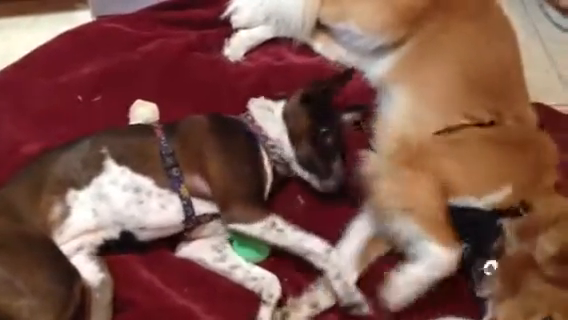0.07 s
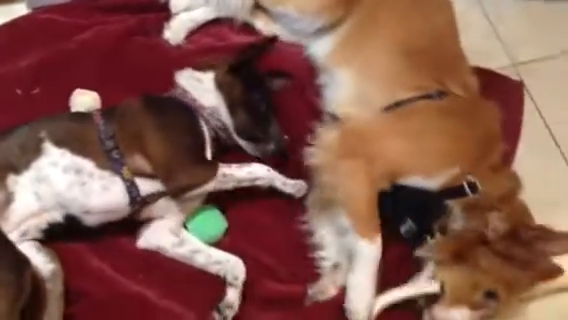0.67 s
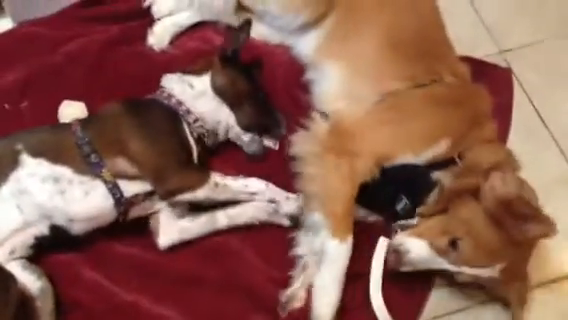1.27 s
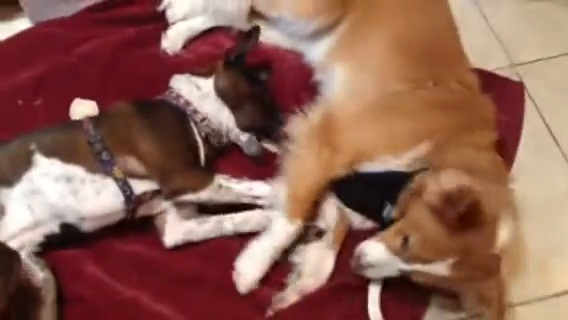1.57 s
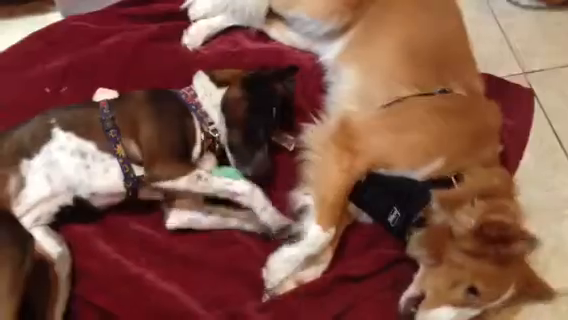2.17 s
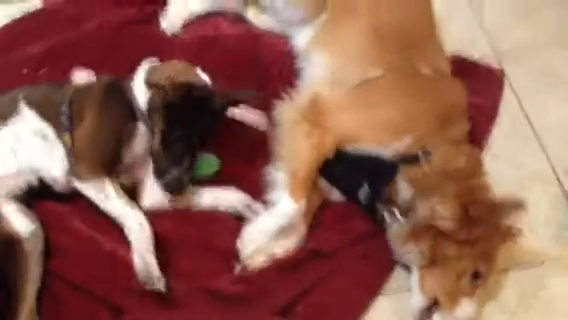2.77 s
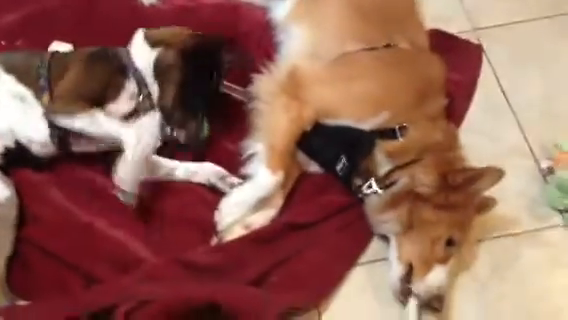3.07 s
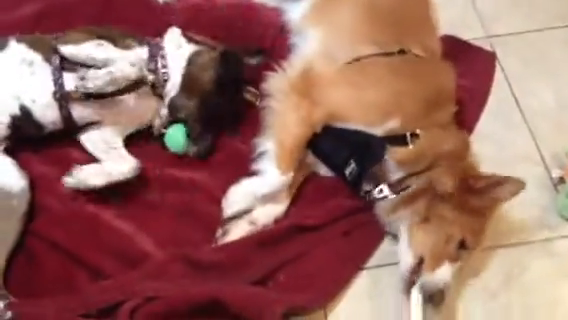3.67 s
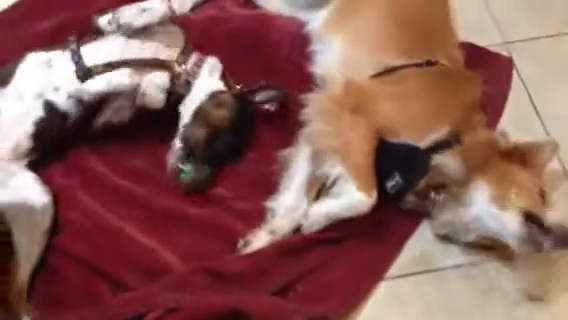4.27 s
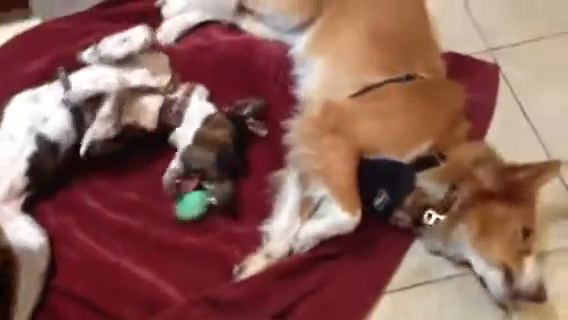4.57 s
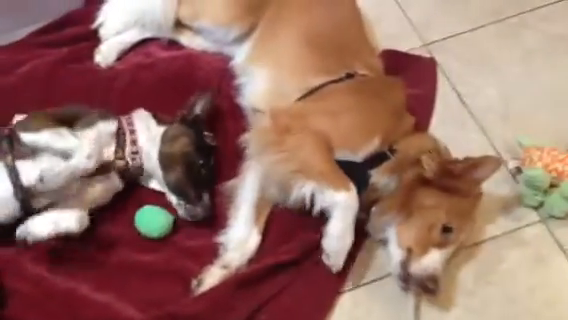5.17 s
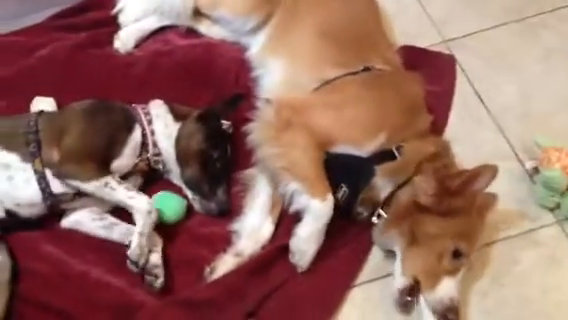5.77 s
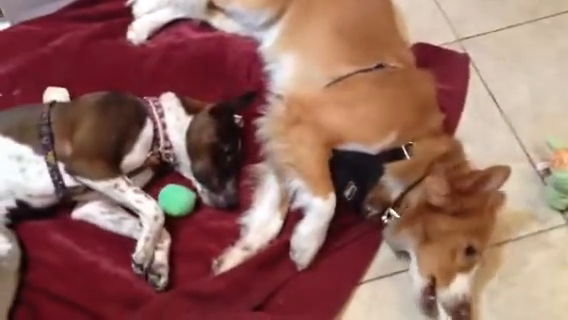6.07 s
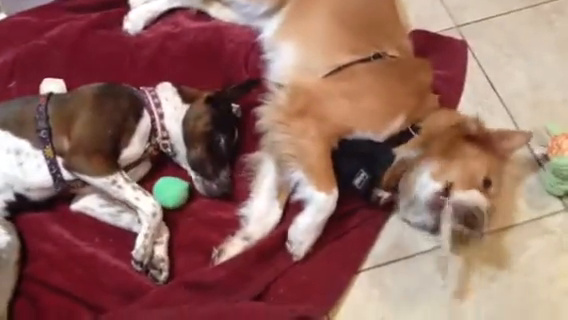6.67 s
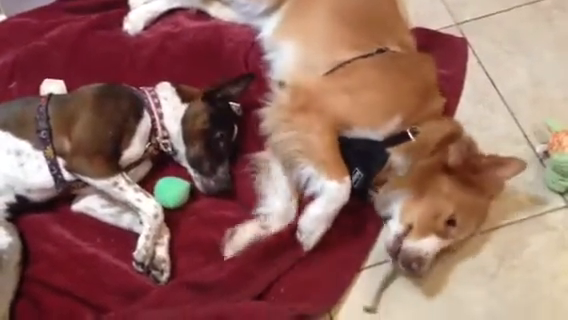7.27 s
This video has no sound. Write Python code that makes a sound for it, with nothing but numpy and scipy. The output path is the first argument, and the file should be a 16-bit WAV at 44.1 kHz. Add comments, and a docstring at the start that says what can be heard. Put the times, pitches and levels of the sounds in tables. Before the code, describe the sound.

A ventilation fan hums low and steady in a tiled room, with a faint hiss of fur sliding on a blanket as two dogs play. Metal collar tags tinkle brightly right at the start. Teeth click softly at 1.3 seconds and the tags clink at 1.7. From 2 to 2.6 seconds a chew bone clatters on teeth and tiles in quick, dry, slightly ringing knocks, with a few more around 3.3. A very faint, thin whine comes at 3.6 and a tag clink at 4. A run of hollow tooth snaps follows, ending in the loudest bone crack at about 4.3 seconds. Lighter knocks, snaps and clinks scatter between 5 and 6.3 seconds, with another faint whine near 6.2. Three sharp bone knocks land between 6.8 and 7 seconds, leaving the hum. The hits have a short room echo.

```python
"""A long chew bone knocks on teeth and floor tiles as two dogs wrestle on a blanket in a tiled room.
Each knock is a dry crack plus the bone's bending modes, damped by the jaws that hold it.
Snapping teeth ring the hollow of the mouth, metal collar tags tinkle and a dog whines faintly.
Underneath, fur rubs on the blanket and a ventilation fan hums."""
import sys
import numpy as np
from scipy import signal
from scipy.fft import rfft, irfft
from scipy.io import wavfile
from scipy.ndimage import uniform_filter1d

SR = 44100
rng = np.random.default_rng(int(sys.argv[2]) if len(sys.argv) > 2 else 0)


def generate_wav(sig):
    """Save sig (samples, or channels by samples) to the path in sys.argv[1] as 16-bit PCM at SR."""
    pcm = np.round(np.clip(np.atleast_2d(sig).T, -1, 1) * 32767).astype(np.int16)
    wavfile.write(sys.argv[1], SR, pcm)


N = 322812
TIME = np.arange(N) / SR
RING_TIME = np.arange(4096) / SR  # time axis of one hit
ATTACK = int(.007 * SR)  # a hit's level is set over these first samples


def undb(db):
    """Decibels to gain."""
    return 10 ** (np.asarray(db) / 20)


def unit(x, count=None):
    """Scale to rms 1, judged on the first count samples."""
    return x / np.sqrt(np.mean(x[:count] ** 2) + 1e-30)


def log_gain(colour, size):
    """Natural-log gain of an EQ curve of (freq_hz, level_db) points on the bins of a transform."""
    hz, db = np.transpose(colour)
    bin_hz = np.arange(size // 2 + 1) * SR / size
    return np.log(undb(np.interp(np.log(bin_hz + 1), np.log(hz), db)))


def noise(colour):
    """Noise of rms 1, shaped by an EQ curve."""
    return unit(irfft(rfft(rng.standard_normal(N)) * np.exp(log_gain(colour, N)), N))


def click(colour, size=1024):
    """The tightest click with a given EQ curve: a minimum-phase impulse."""
    cepstrum = irfft(log_gain(colour, size))
    cepstrum[1:size // 2] *= 2
    cepstrum[size // 2 + 1:] = 0
    return irfft(np.exp(rfft(cepstrum)))


def drift(rate_hz):
    """Smooth random modulation of rms 1."""
    hold = int(SR / rate_hz)
    steps = np.repeat(rng.standard_normal(N // hold + 1), hold)
    return unit(uniform_filter1d(uniform_filter1d(steps, hold), hold)[:N])


def fade(t, t60):
    """Exponential decay by 60 dB in t60 seconds."""
    return np.exp(-np.log(1000) * t / t60)


def contact(t60, grit, size=512):
    """A hard touch followed by a brief chatter of the surfaces."""
    push = grit * unit(rng.standard_normal(size)) * fade(RING_TIME[:size], t60)
    push[0] += 1
    return push


def ring(push, hz, t60, rise_cycles=1.66):
    """Modes driven by one push, a row each, with a quick build-up and rms 1 over the attack."""
    hz, t60 = np.reshape(hz, (-1, 1)), np.reshape(t60, (-1, 1))
    build_up = 1 - np.exp(-hz * RING_TIME / rise_cycles)
    free = np.sin(2 * np.pi * hz * RING_TIME) * fade(RING_TIME, t60) * build_up
    modes = signal.fftconvolve(free, push[None], axes=1)[:, :len(RING_TIME)]
    return modes / np.sqrt(np.mean(modes[:, :ATTACK] ** 2, axis=1, keepdims=True))


def radiate(x, hz):
    """Low cut: a small body hardly moves air below hz."""
    return signal.sosfilt(signal.butter(2, hz, "highpass", fs=SR, output="sos"), x)


def add(out, start_s, x):
    """Mix x into out at start_s."""
    i = max(int(start_s * SR), 0)
    out[i:i + len(x)] += x[:max(N - i, 0)]


def room_tails(count=12, size=16384, predelay_s=0.0052, build_s=0.0023, wall_s=.0115, wall_db=-12):
    """Reverbs for several spots in the tiled room: a slap off a near wall and a diffuse tail."""
    # reverb bands: centre_hz, t60_s, relative_db
    bands = [(400, 0.28, 9), (1020, 0.39, 4.5), (2300, 0.32, 0.5), (4550, 0.32, 3), (7200, 0.34, 0),
             (13800, 0.22, 2.5)]
    hz, t60, db = np.transpose(bands)
    t = np.arange(size) / SR
    log_hz = np.log(np.arange(size // 2 + 1) * SR / size + 1)
    spectra = rfft(rng.standard_normal((count, size)))
    tails = np.zeros((count, size))
    for band, decay_s, band_db in zip(np.eye(len(hz)), t60, db):
        crossover = np.interp(log_hz, np.log(hz), band)
        tails += undb(band_db) * irfft(spectra * crossover, size) * fade(t, decay_s)
    onset = np.clip((t - predelay_s) / build_s, 0, 1)
    tails *= onset / np.linalg.norm(onset * fade(t, t60.mean()))
    tails[:, int(wall_s * SR)] += undb(wall_db)
    return tails


def in_room(x, tails, wet_db):
    """The dry sound plus a reverb picked at random, since the dogs keep moving."""
    out = undb(wet_db) * signal.fftconvolve(x, tails[rng.integers(len(tails))])
    out[:len(x)] += x
    return out


def machine_tone(hz, waver_hz=0.783, waver_db=2, knot_count=40):
    """A tone of rms near 1 that wavers slightly in pitch and level."""
    knots = np.linspace(0, TIME[-1], knot_count)
    pitch_hz = np.interp(TIME, knots, hz + waver_hz * rng.standard_normal(knot_count))
    gain = np.interp(TIME, knots, undb(waver_db * rng.standard_normal(knot_count)))
    return np.sqrt(2) * gain * np.sin(2 * np.pi * np.cumsum(pitch_hz) / SR)


def fan(air_db=-50.5, flutter_db=0.111, motor_trim_db=-1):
    """The bed: rushing air, the hum of blades and mains, and a motor tone that swells."""
    # EQ of the rushing air: freq_hz, relative_db
    air_colour = [(25, -42), (55, -28.5), (100, -22), (150, -9), (235, -1), (300, -7), (480, -11.5),
                  (820, -11.5), (1400, -19.5), (2300, -24), (3600, -23.5), (4300, -36), (9000, -44.5),
                  (15500, -45)]
    # steady tones of fan and mains: pitch_hz, level_db
    hum_tones = [(86.5, -72), (120, -68), (149.5, -65.5), (200, -61.5), (230.5, -57), (249, -62.5),
                 (399.5, -68)]
    # fader moves of the motor tone: time_s, relative_db
    motor_swell = [(0, -65), (3.3, -67), (4.3, -52), (4.6, -64), (4.95, -52), (5.2, -62), (5.45, -51),
                   (7.32, -49.5)]
    air = noise(air_colour) * undb(air_db + flutter_db * drift(3.1))
    swell_db = np.interp(TIME, *np.transpose(motor_swell))
    motor = machine_tone(hz=172.4, waver_hz=0.33, waver_db=1.2) * undb(swell_db + motor_trim_db)
    hum = sum(undb(db) * machine_tone(hz) for hz, db in hum_tones)
    return air + motor + hum


def fur(rise_s=0.072, floor_db=-67.5, trim_db=-1, flicker_db=1):
    """Coats slide over the blanket in uneven strokes that start quickly and die away over a faint steady hiss."""
    # strokes of fur: start_s, relative_db, t60_s
    strokes = [(-.1, -53, 1.8), (.76, -59.5, 3.5), (1.66, -58.5, 3.9), (3.1, -67, 3), (4.55, -64, 5.4),
               (6.9, -64, 6)]
    # EQ of the rubbing cloth: freq_hz, relative_db
    cloth_colour = [(1500, -9), (4000, -5), (6000, 5), (8300, 6.5), (9800, -6.5), (15500, 0)]
    power = undb(floor_db) ** 2
    for start_s, db, t60 in strokes:
        rise = np.clip((TIME - start_s) / rise_s, 0, 1)
        decay = fade(np.maximum(TIME - start_s - rise_s, 0), t60)
        power = power + (undb(db) * rise * decay) ** 2
    return noise(cloth_colour) * np.sqrt(power) * undb(trim_db + flicker_db * drift(35))


def whines(tails, waver=0.024, rough_db=4, trim_db=-3):
    """A thin, hoarse, unsteady tone through the nose; it slides to its resting pitch and fades."""
    # faint whines: start_s, length_s, relative_db, first_pitch_hz, resting_pitch_hz
    calls = [(3.565, 0.16, -53.5, 713, 850), (6.15, 0.35, -54, 849, 749)]
    attack_s, release_s, settle_s, sag_db = 0.0027, 0.02, 0.062, -21.5
    out = np.zeros(N)
    wobble = 1 + waver * drift(300)
    hoarse = undb(trim_db + rough_db * drift(90))
    for start_s, length_s, db, first_hz, rest_hz in calls:
        sounding = (TIME > start_s) & (TIME < start_s + length_s)
        t = TIME[sounding] - start_s
        glide_hz = rest_hz + (first_hz - rest_hz) * np.exp(-t / settle_s)
        voice = np.sin(2 * np.pi * np.cumsum(glide_hz * wobble[sounding]) / SR)
        gate = np.clip(np.minimum(t / attack_s, (length_s - t) / release_s), 0, 1)
        envelope = gate * undb(db + sag_db * t / length_s)
        add(out, start_s, in_room(envelope * hoarse[sounding] * voice, tails, wet_db=2.5))
    return out


def tag_touches(count=3, gap_s=0.056, gap_spread=0.41, rebound_db=-12.5):
    """Each swing of the tags gives a first touch, then ever weaker rebounds at uneven gaps."""
    # tags and harness rings swing together: start_s, relative_db, struck_hz
    swings = [(.0074, -31.5, 11300), (.0234, -34.5, 13900), (.045, -42, 11400), (.1062, -42, 14600),
              (.151, -36, 14500), (.167, -37.5, 8300), (1.717, -44, 12100), (1.7396, -39, 9220),
              (2.857, -49, 8250), (3.1667, -48.5, 8250), (3.9524, -31, 13700), (4.078, -42, 14000),
              (4.942, -40.5, 11500), (5.6086, -43.5, 7300), (5.992, -41, 8000), (6.3075, -39.5, 12300)]
    for start_s, db, struck_hz in swings:
        for bounce, wait_s in enumerate(gap_s * np.exp(gap_spread * rng.standard_normal(count))):
            yield start_s, db + bounce * rebound_db, struck_hz
            start_s += wait_s


def tags(tails, trim_db=-11, focus_db=12, focus_hz=600, scatter_db=3, tick_db=-4, detune=0.0027):
    """Small metal plates tick and ring; modes near the struck pitch are boosted, all vary by chance."""
    # modes of the tags: pitch_hz, t60_s, relative_db
    modes = [(6730, 0.046, 0), (7600, 0.0299, 0), (8300, 0.011, -0.5), (9200, 0.027, -2.5),
             (11000, 0.061, -1), (11610, 0.028, 6.5), (12420, 0.027, -13.5), (13900, 0.043, -24),
             (13700, 0.0595, -5), (15040, 0.037, -5), (14900, .025, -27)]
    # EQ of the bright tick: freq_hz, relative_db
    tick_colour = [(2500, -37.5), (7000, 1.0), (10000, -15.5), (13000, 11), (16000, 12.5), (18000, -30)]
    hz, t60, mode_db = np.transpose(modes)
    out = np.zeros(N)
    for start_s, db, struck_hz in tag_touches():
        push = contact(t60=0.018, grit=0.77)
        boost_db = focus_db * np.exp(-((hz - struck_hz) / focus_hz) ** 2)
        weights = undb(mode_db + boost_db + scatter_db * rng.standard_normal(len(hz)))
        plate_hz = hz * (1 + detune * rng.standard_normal(len(hz)))  # no two plates are alike
        clink = unit(weights @ ring(push, plate_hz, t60), ATTACK)
        tick = np.convolve(push, click(tick_colour))
        clink[:len(tick)] += undb(tick_db) * unit(tick, ATTACK)
        add(out, start_s, in_room(undb(db + trim_db) * clink, tails, wet_db=-5.0))
    return radiate(out, hz=2520)


def jaws(tails):
    """Teeth meet or close on the bone and briefly ring the hollow of the mouth."""
    # jaws snapping shut: start_s, level_db, mouth_hz, reverb_send_db
    snaps = [(1.2795, -41.5, 1520, -5), (1.283, -43.5, 1110, -6.5), (1.9642, -62, 1210, -8),
             (2.5658, -47, 1060, -2), (2.8875, -46.5, 1020, -6.5), (3.571, -44.5, 914, -1.5),
             (3.584, -47, 765, 1), (4.1272, -34.5, 1073, -9), (4.1796, -29, 1123, -16),
             (4.1947, -38, 1060, -12), (4.231, -27.5, 1067, -11), (4.257, -35, 1040, -8),
             (4.323, -25, 994, -6.5), (5.3786, -44.5, 1110, -1), (5.628, -37, 1064, -6.5),
             (5.692, -35, 1067, -6.5), (5.998, -36.5, 1115, -6), (6.163, -52, 866, 3),
             (6.835, -30.5, 1090, -11)]
    mode_ratios, mode_db = np.array([1, 1.5, .68]), np.array([0, -12, -11])
    out = np.zeros(N)
    for start_s, db, mouth_hz, wet_db in snaps:
        modes = ring(contact(t60=0.014, grit=0.24), mouth_hz * mode_ratios, t60=[.018, .005, .006])
        add(out, start_s, in_room(undb(db + mode_db) @ modes, tails, wet_db))
    return radiate(out, hz=402)


def softness_db(hz, corner_hz):
    """A soft touch lasts longer and drives little above its corner."""
    return -10 * np.log10(1 + (hz / corner_hz) ** 4)


def place_db(place, half_waves, node_leak=0.015):
    """A mode rings most when struck on a crest of its bending shape, least on a node."""
    return 10 * np.log10(node_leak + np.cos(np.pi * place * half_waves) ** 2)


def bone(tails, crack_db=-11, grip_db=5, detune=0.0029):
    """Knocks ring the bone's modes; a tight grip shortens and detunes the ring and bares the dry crack."""
    # knocks on teeth and tiles: start_s, level_db, hardness_corner_hz,
    # place (0 = tip, 0.5 = middle), ring_scale (1 = free), reverb_send_db
    knocks = [(1.2795, -48.5, 1290, 0.53, 0.14, 2), (1.9641, -21.5, 2930, 0.48, 1, -3),
              (2.118, -37.5, 6600, 0.61, 1.2, -4), (2.1281, -26.5, 7000, 0.22, 1.2, 2),
              (2.1385, -19.5, 6200, .2, 1.4, -2.5), (2.1451, -23, 6100, 0.3, 1.9, -6),
              (2.2, -27, 7600, 0.29, 0.77, -0.5), (2.2422, -36, 8800, 0.023, 1, 0.5),
              (2.4601, -48.5, 6600, 0.38, 0.17, 1), (2.5664, -30, 6600, 0.072, 0.56, 1.5),
              (2.888, -49.5, 9000, 0.13, 0.28, -3.5), (3.243, -48, 1200, 0.44, 0.88, 2),
              (3.2773, -25.5, 6000, 0.023, 0.72, -2), (3.336, -41, 1800, 0.32, 1.1, 0),
              (3.359, -39, 3670, 0.47, 0.58, 4.5), (3.8737, -44.5, 4500, .11, 0.68, -9),
              (4.1816, -43, 10400, 0.31, 0.6, -6), (4.1944, -37, 4770, 0.31, 0.18, -1.5),
              (4.323, -13.5, 8300, 0.53, 0.37, -4.5), (4.352, -20, 1900, 0.49, 1.8, -2),
              (5.3023, -44.5, 1590, 0.37, 0.49, -.5), (5.3588, -37, 1400, 0.48, 1.2, -8),
              (5.3783, -32, 6560, 0.068, 0.78, -2.5), (5.402, -38.5, 3200, 0.043, 0.41, -2),
              (5.628, -45, 2500, 0.36, .3, -1.5), (5.692, -28, 4580, 0.4, 0.42, -1.5),
              (5.998, -36.5, 2000, .1, 0.36, -0.5), (6.0712, -38, 2100, 0.08, 1.15, -9),
              (6.089, -41.5, 2400, 0.075, 0.63, -3.5), (6.3087, -40, 5500, 0.094, .8, -3),
              (6.835, -16, 5200, 0.3, 0.34, -3.5), (6.9407, -23, 1610, 0.027, .7, -6.5),
              (6.9819, -19, 4500, 0.45, 1.03, -6)]
    # modes of the uneven bone, bending in two planes: pitch_hz, t60_s, relative_db, half_waves
    modes = [(2028, 0.12, -9.5, 2.6), (2316, 0.04, 4.5, 1.96), (3310, 0.022, 2.5, 3.45),
             (3520, 0.026, -10, 4.3), (4847, 0.034, 0.5, 5.17), (5216, .028, -2.5, 4.26),
             (6330, 0.018, -4.5, 4.2), (7270, 0.011, 8.5, 5.4), (8580, 0.0122, -3.5, 6.4),
             (11130, .018, -16.5, 5.5), (12700, .016, -19, 7.9), (15100, 0.00876, -21.5, 8.7)]
    # EQ of the crack at the hardest touch: freq_hz, relative_db
    crack_colour = [(100, -32.5), (450, -9.5), (1000, -6.5), (1550, -10.5), (2000, 2.5), (3300, 0.5),
                    (4400, -7), (5400, 1.5), (6300, -6.5), (7500, -5.5), (8700, 0), (10000, -21),
                    (12000, -2.5), (15500, -23.5)]
    soft_share, place_share = 0.77, 0.4  # how far the crack's EQ follows softness and place
    force_slope, typical_db = 0.05, -33.5  # above a typical knock the crack gains on the ring
    hz, t60, mode_db, half_waves = np.transpose(modes)
    crack_hz, hard_db = np.transpose(crack_colour)
    out = np.zeros(N)
    for start_s, db, corner_hz, place, ring_scale, wet_db in knocks:
        ring_scale = max(ring_scale, .2)
        shape_db = place_db(place, half_waves)
        held_hz = hz * (1 + detune * rng.standard_normal() / ring_scale)
        weights = undb(mode_db + shape_db + softness_db(hz, corner_hz))
        ringing = ring(contact(t60=0.013, grit=0.19), held_hz, t60 * ring_scale)
        knock = weights / np.linalg.norm(weights) @ ringing
        colour_db = hard_db + soft_share * softness_db(crack_hz, corner_hz)
        colour_db += place_share * np.interp(crack_hz, hz, shape_db)
        impulse = click(np.column_stack([crack_hz, colour_db]))
        crack = unit(np.convolve(contact(t60=0.016, grit=1.0), impulse), ATTACK)
        blend_db = crack_db - grip_db * np.log2(ring_scale) + force_slope * (db - typical_db)
        knock[:len(crack)] += undb(blend_db) * crack
        add(out, start_s, in_room(undb(db) * unit(knock, ATTACK), tails, wet_db))
    return radiate(out, hz=585)


def scene():
    """Mono mix: bone, jaws, tags and whines share the room's reverb over dry fur and fan."""
    tails = room_tails()
    return (bone(tails) + jaws(tails) + tags(tails) + whines(tails) + fur() + fan())[None]


def record(dry, top_hz=15400):
    """A steep high cut takes off the very top."""
    return signal.sosfilt(signal.ellip(10, .2, 80, top_hz, fs=SR, output="sos"), dry)


dry = scene()
out = record(dry)
generate_wav(out)
```